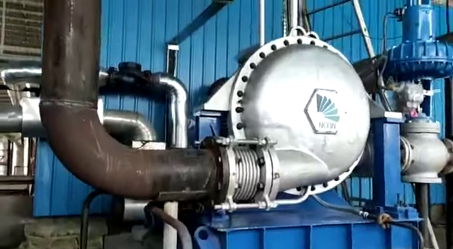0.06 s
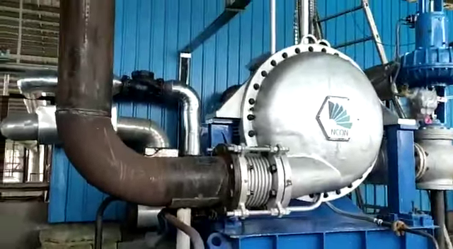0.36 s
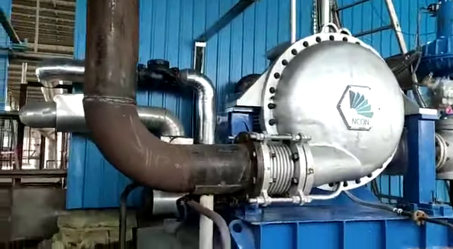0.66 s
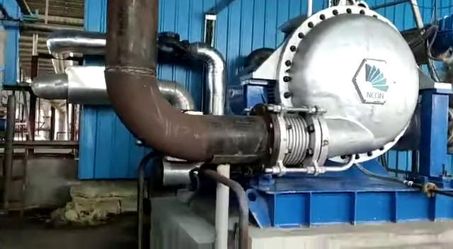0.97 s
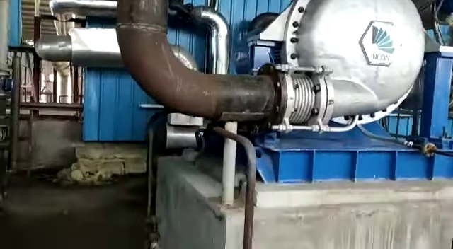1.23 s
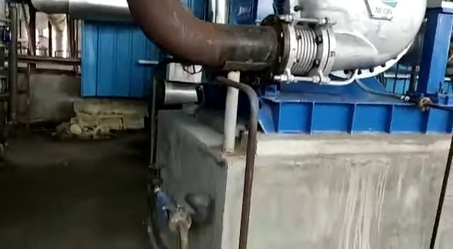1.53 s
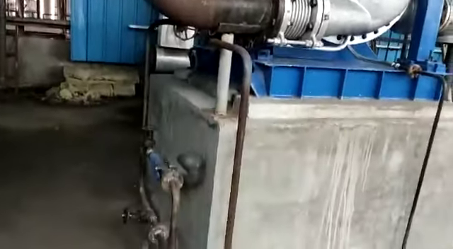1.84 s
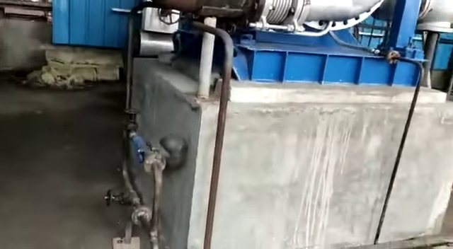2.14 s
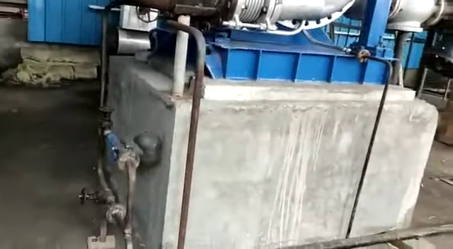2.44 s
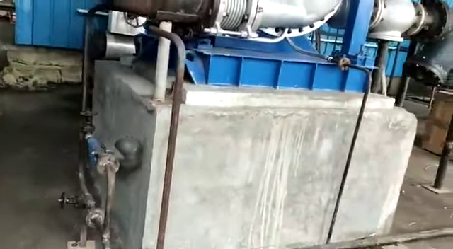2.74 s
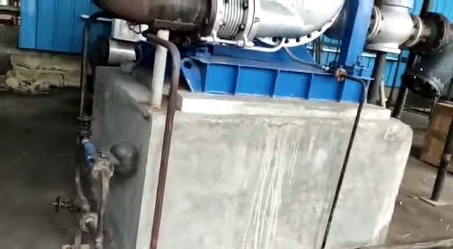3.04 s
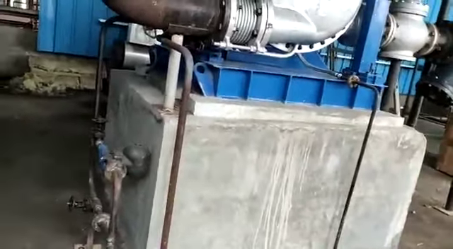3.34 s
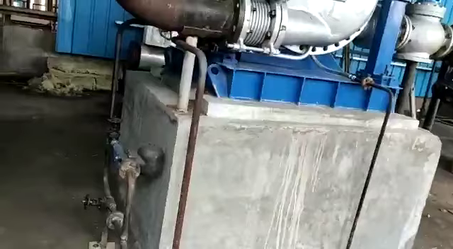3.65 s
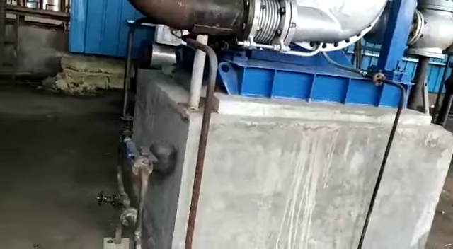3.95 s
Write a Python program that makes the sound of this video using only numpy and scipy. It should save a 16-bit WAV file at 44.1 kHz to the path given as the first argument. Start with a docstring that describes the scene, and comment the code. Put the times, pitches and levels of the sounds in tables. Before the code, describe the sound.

A steam turbine runs steadily inside a metal shed, its deep hum and singing shaft tones mixed with roaring, hissing steam. Two thin high whines waver in and out as the hand-held microphone moves a few steps away.

```python
"""A deep hum, singing notes and a rush of steam, all at once: a steam turbine runs in a metal shed.
The generator hums, the fast shaft sings, and steam roars, hisses and whistles through casing and pipes.
Echoes make loud and quiet spots in the shed (standing waves). As the hand-held microphone moves
through them, two thin whines from blades and gears fade in and out, differently in each ear.
A faint note sits behind it all, and a narrow band of the roar near 355 Hz flickers in loudness."""
import sys
import numpy as np
from scipy.fft import rfft, irfft
from scipy.io import wavfile

SR = 44100
rng = np.random.default_rng(int(sys.argv[2]) if len(sys.argv) > 2 else 0)


def generate_wav(sig):
    """Save sig (samples, or channels by samples) to the path in sys.argv[1] as 16-bit PCM at SR."""
    pcm = np.round(np.clip(np.atleast_2d(sig).T, -1, 1) * 32767).astype(np.int16)
    wavfile.write(sys.argv[1], SR, pcm)


N = 176400
TIME = np.arange(N) / SR
FREQS = np.maximum(np.arange(N // 2 + 1) * SR / N, 1)


def from_db(db):
    """Turn decibels into a number to multiply by."""
    return 10 ** (np.asarray(db) / 20)


def in_time(rows):
    """Join a table's points in time with straight lines: one curve for each column after the first."""
    times, *columns = np.transpose(rows)
    return np.array([np.interp(TIME, times, column) for column in columns])


def at_freqs(rows):
    """Read a table at every frequency, joining its points on a scale of octaves."""
    hz, values = np.transpose(sorted(rows))
    return np.interp(np.log(FREQS), np.log(hz), values)


def pan(db):
    """Left and right gains that make the left ear louder by db."""
    gains = from_db(np.array([[.5], [-.5]]) * db)
    return gains / np.sqrt(np.mean(gains ** 2, axis=0))


def drift(rate_hz, channels=1):
    """A slow random wander around zero, typically of size 1."""
    keep_slow = 1 / (1 + (FREQS / rate_hz) ** 2) ** 2
    slow = irfft(rfft(rng.standard_normal((channels, N))) * keep_slow, N)
    slow = slow - slow.mean(axis=1, keepdims=True)
    return slow / slow.std(axis=1, keepdims=True)


def tone(hz, waver, rate_hz, channels=1, phase=0):
    """A pure note plus its echoes, whose sum wavers in strength and timing; average power 1."""
    wobble = 1 + waver * (drift(rate_hz, channels) + 1j * drift(rate_hz, channels))
    wobble = wobble / np.sqrt(np.mean(abs(wobble) ** 2, axis=1, keepdims=True))
    cycles = hz * TIME + rng.random()
    return np.sqrt(2) * np.real(wobble * np.exp(2j * np.pi * cycles + 1j * phase))


# The hum's notes: multiple of the turning speed, level/dB, left minus right/dB, wavering share
HUM_NOTES = [(1, -32.5, 6, 0.21), (2, -13, 1.3, 0.009), (3, -37, 1, 0.24)]
# Their shared rise and fall: t/s, level change/dB
HUM_SWELL = [(0, -0.5), (.6, -.7), (2.1, -.5), (2.6, 0.1), (3.5, 0.5), (4, 0)]
# The note at four times the turning speed, loud only in places: t/s, level/dB
HUM_FOURTH = [(0, -30), (.4, -25), (.8, -41), (1.1, -54), (2.6, -41), (4, -39)]

def generator(turning_hz=49.93):
    """The generator hums deeply, strongest at twice its turning speed."""
    hum = sum(from_db(db) * pan(pan_db) * tone(multiple * turning_hz, waver, rate_hz=3.9)
              for multiple, db, pan_db, waver in HUM_NOTES)
    fourth = from_db(in_time(HUM_FOURTH)) * tone(4 * turning_hz, waver=0.16, rate_hz=2.9)
    return from_db(in_time(HUM_SWELL)) * hum + fourth


# The shaft's three lowest notes along the microphone's path: t/s, left level/dB, right level/dB
SHAFT_FIRST = [(0.0, -18.5, -18), (0.22, -24, -25), (0.34, -20, -21.5), (1.26, -30, -27), (1.78, -44, -51),
               (1.9, -35.5, -37), (2.7, -22.5, -27), (2.86, -26, -29.5), (3.58, -24.5, -27.5),
               (3.99, -29, -26.5)]
SHAFT_SECOND = [(0.0, -33, -35), (0.3, -35, -42.0), (0.98, -27, -34), (1.24, -27, -26), (1.4, -26.5, -31.5),
                (2.44, -26, -27), (3.04, -37, -30.5), (3.44, -44, -32), (3.8, -41, -49), (3.99, -40, -44)]
SHAFT_THIRD = [(0, -32.5, -31), (.5, -35.5, -28.5), (.88, -31.5, -26), (1.2, -36.5, -28.5),
               (1.78, -31.5, -27.5), (2.28, -37, -30.5), (2.78, -28.5, -32), (2.98, -31, -36),
               (3.56, -27.5, -32.5), (4, -28, -35.5)]
# Its higher notes: multiple of the turning speed, level/dB
SHAFT_OVERTONES = [(4, -38), (5, -49), (8, -41)]

def shaft(turning_hz=250.2):
    """The shaft sings at multiples of its speed, each note with its own loud and quiet spots."""
    low = sum(from_db(in_time(levels)) * tone(multiple * turning_hz, waver=0.041, rate_hz=16, channels=2)
              for multiple, levels in enumerate((SHAFT_FIRST, SHAFT_SECOND, SHAFT_THIRD), start=1))
    high = sum(from_db(db) * tone(multiple * turning_hz, waver=0.25, rate_hz=9.4, channels=2)
               for multiple, db in SHAFT_OVERTONES)
    return low + high


# The blade whine at the ears: t/s, left level/dB, right level/dB, likeness (1 in step, -1 opposite)
BLADE_WHINE = [(0.0, -31, -26, 0.1), (0.12, -24, -29, 0.7), (0.28, -29, -25, 0.4), (0.4, -33, -28, -0.2),
               (0.52, -26, -21, -0.6), (0.58, -24, -31, -0.8), (0.74, -26, -27, -0.6),
               (0.78, -24, -30, 0.5), (0.88, -29, -24, -0.7), (0.94, -30, -23, 0.7), (1.0, -30, -27, -0.1),
               (1.04, -31, -18, -0.5), (1.1, -25, -27, 0.6), (1.2, -28, -30, 0.4), (1.24, -24, -24, 0.8),
               (1.36, -36, -27, 0.4), (1.46, -30, -24, 0.4), (1.5, -30, -27, -0.6), (1.6, -29, -24, 0.4),
               (1.68, -22, -30, -0.6), (1.74, -31, -28, -0.2), (1.78, -26, -24, 0.9),
               (1.92, -30, -19, -0.8), (2.02, -22, -21, -0.6), (2.1, -24, -28, 0.5), (2.24, -38, -30, -0.2),
               (2.28, -30, -23, 0.8), (2.36, -25, -25, 0.6), (2.4, -29, -31, -0.2), (2.44, -29, -24, 0.8),
               (2.5, -21, -21, 0.4), (2.54, -22, -30, 0.2), (2.76, -32, -26, -0.1), (2.88, -33, -30, 0.5),
               (3.06, -27, -31, -0.1), (3.16, -35, -30, 0.3), (3.26, -33, -35, -0.3), (3.38, -26, -26, 0.9),
               (3.58, -26, -21, 0.7), (3.7, -33, -26, -0.4), (3.76, -27, -23, -0.8), (3.82, -28, -31, 0.1),
               (3.92, -29, -27, -0.2), (3.99, -36, -32, -0.4)]

def blade_whine(hz=9859, trim_db=-0.2):
    """The blades' short sound waves fade quickly at each ear and fall in and out of step."""
    left_db, right_db, likeness = in_time(BLADE_WHINE)
    ear_phases = np.arccos(np.clip(likeness, -1, 1)) * np.array([[.5], [-.5]])
    gains = from_db(np.array([left_db, right_db]) + trim_db)
    return gains * tone(hz, waver=0.14, rate_hz=34, channels=2, phase=ear_phases)


# The gear whine's rise and fall: t/s, level/dB
GEAR_WHINE = [(0, -39), (.9, -38.5), (1.15, -36), (1.45, -36), (1.9, -34), (2.2, -35), (2.45, -38.5),
              (2.95, -35.5), (3.3, -41), (4, -35)]

def gear_whine(hz=4132):
    """The gear teeth make a lower, fluttering whine, a little to the left."""
    return from_db(in_time(GEAR_WHINE)) * pan(db=3.5) * tone(hz, waver=0.6, rate_hz=18, channels=2)


# Steam's roar in pipes and shed, and its hiss in nozzles and valve: f/Hz, level/dB in each hertz
ROAR = [(12, -51), (36, -45), (65, -46.5), (130, -49), (172, -46.5), (195, -42), (222, -50), (290, -46),
        (328, -46), (352, -43.5), (380, -42.5), (405, -50), (450, -52), (500, -54), (550, -49.5),
        (690, -51), (830, -48.5), (1000, -51.5), (1170, -52), (1500, -51), (2050, -51.5), (2350, -54),
        (2630, -53.5), (2950, -57)]
HISS = [(3600, -56), (4150, -55.5), (5000, -57), (5400, -59), (5850, -55), (6350, -58), (6800, -55.5),
        (7450, -55.5), (8100, -58), (8750, -60), (9300, -61.5), (9750, -54.5), (10300, -57.5), (10800, -57),
        (11400, -56.3), (12100, -55.5), (12500, -59), (13000, -72), (14000, -66), (15100, -80)]
# How alike the steam is in the two ears: f/Hz, likeness (1 the same, 0 unrelated)
STEAM_LIKENESS = [(30, 0.89), (100, 1), (200, 0.97), (370, 0.85), (690, 0.47), (1260, -0.2), (2300, 0.0056),
                  (14000, -0.054)]
# Which side the steam leans to: f/Hz, left minus right/dB
STEAM_PAN = [(100, 2.5), (400, 1.5), (600, 1), (1200, 1.5), (2200, 3.5), (3300, 1), (5200, 1), (7200, 4),
             (9200, -2), (11500, 1), (14000, .1)]
# The rise and fall of five bands of the steam, low to high: t/s, level change/dB
RUMBLE_SWELL = [(0, -3.5), (.4, 3.5), (1.0, -1), (1.9, 1.5), (3.25, -2.5), (3.8, 0), (4, 5.5)]
BODY_SWELL = [(0, -1), (1.0, -1), (1.9, 0), (2.75, -1), (3.25, -1), (4, -2)]
HOLLOW_SWELL = [(0, -1.5), (.7, -.5), (1.0, 0.9), (1.9, -1.3), (2.4, 0), (2.8, 0.4), (3.25, 0),
                (3.75, -0.5)]
SIZZLE_SWELL = [(0, 1), (.7, -0.3), (1.3, -0.5), (2.2, -0.5), (2.8, -1.5), (3.3, -1.5), (4, -0.9)]
HISS_SWELL = [(0, 0), (.6, -1.3), (1.2, -0.5), (1.7, -0.5), (2.6, 0), (3.3, -0.5), (4, -2)]

def steam(flicker_db=0.5):
    """Flowing steam makes a smooth noise whose colour shifts a little as the microphone moves."""
    shared, opposed = rfft(rng.standard_normal((2, N)))
    likeness = np.clip(at_freqs(STEAM_LIKENESS), -1, 1)
    noise = np.sqrt(1 + likeness) * shared + np.sqrt(1 - likeness) * opposed * [[1], [-1]]
    spectrum = noise * np.sqrt(SR) / 2 * from_db(at_freqs(ROAR + HISS)) * pan(at_freqs(STEAM_PAN))
    bands_hz = [90, 190, 350, 800, 1500, 3000, 5400, 11000]
    swells = {190: RUMBLE_SWELL, 350: BODY_SWELL, 800: HOLLOW_SWELL,
              5400: SIZZLE_SWELL, 11000: HISS_SWELL}
    flow = np.zeros((2, N))
    for centre in bands_hz:
        share = at_freqs([(hz, hz == centre) for hz in bands_hz])   # 1 here, 0 at the other centres
        swell_db = in_time(swells[centre]) if centre in swells else 0
        flow += irfft(spectrum * share, N) * from_db(swell_db + flicker_db * drift(rate_hz=12))
    return flow


# Faint steam whistles: f/Hz, width/Hz, level/dB
WHISTLES = [(2630, 60, -41), (5150, 60, -45), (7555, 35, -43), (10525, 30, -44), (11665, 45, -42),
            (11964, 50, -39), (12219, 40, -42), (12379, 35, -43)]

def whistles():
    """Steam blows narrow bands of noise into ringing, like breath across a bottle."""
    power = sum(from_db(db) ** 2 / width / (1 + ((FREQS - hz) / width) ** 2) ** 2
                for hz, width, db in WHISTLES)
    return irfft(rfft(rng.standard_normal((2, N))) * np.sqrt(power * SR / np.pi), N)


def pump(hz=1100.8, level_db=-42):
    """A faint, wavering note, perhaps from the oil pump."""
    return from_db(level_db) * tone(hz, waver=0.86, rate_hz=2.9, channels=2)


# Moments when the roar near 355 Hz happens to be loudest: t/s, level/dB
FLICKER_PEAKS = [(.63, -27), (1.42, -26), (1.86, -22), (2.16, -23.5), (2.41, -24.5), (2.56, -27.5),
                 (2.72, -22.5), (2.84, -23.5), (3.76, -23)]

def roar_flicker(hz=356.8, half_peak_s=0.05):
    """A narrow band of the roar flickers by chance, played as a wavering tone with the listed peaks."""
    loudness = sum(from_db(db) * np.exp(-((TIME - peak_s) / half_peak_s) ** 2)
                   for peak_s, db in FLICKER_PEAKS)
    return loudness * tone(hz, waver=0.087, rate_hz=25)


def scene():
    """The whole machine, heard from a few steps away."""
    turning_parts = generator() + shaft() + blade_whine() + gear_whine()
    return turning_parts + steam() + whistles() + pump() + roar_flicker()


def record(dry):
    """Flatten any peak that overloads, then cut the highest treble steeply."""
    cutoff_hz = 15150
    clipped = np.clip(dry, -1, 1)
    return irfft(rfft(clipped) / np.sqrt(1 + (FREQS / cutoff_hz) ** 300), N)


dry = scene()
out = record(dry)
generate_wav(out)
```